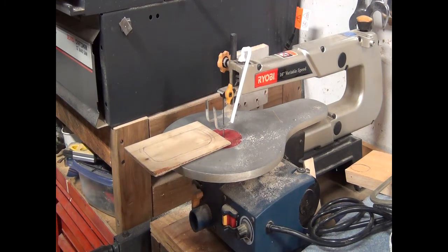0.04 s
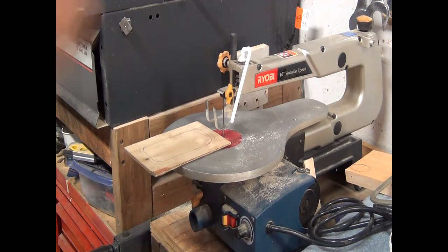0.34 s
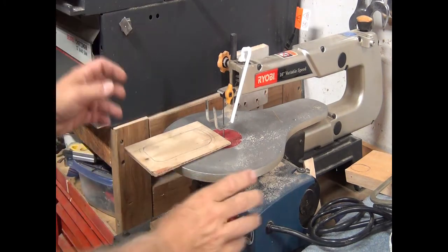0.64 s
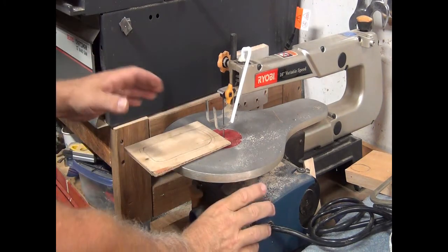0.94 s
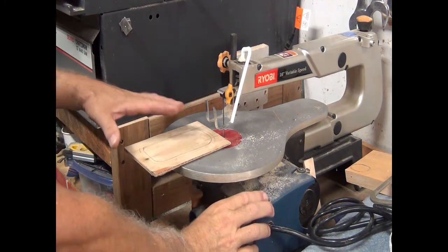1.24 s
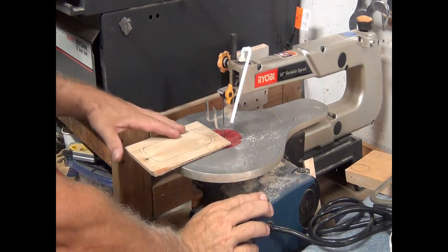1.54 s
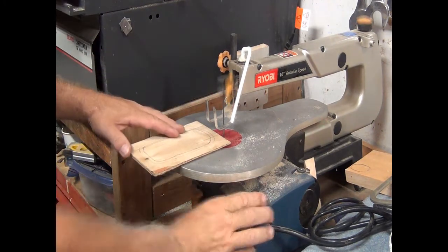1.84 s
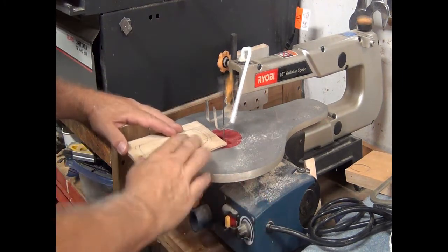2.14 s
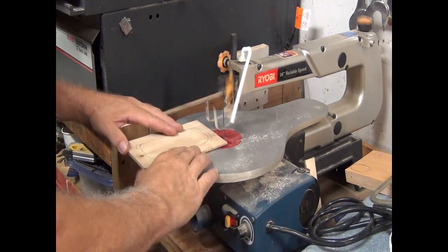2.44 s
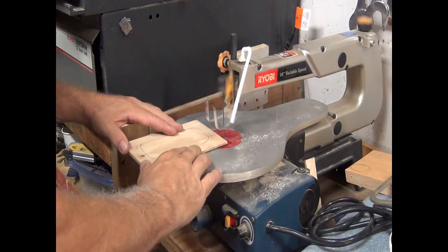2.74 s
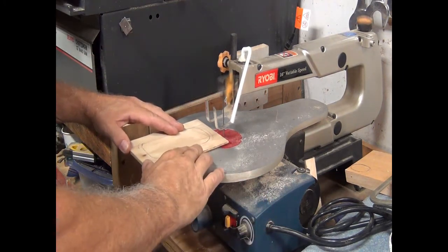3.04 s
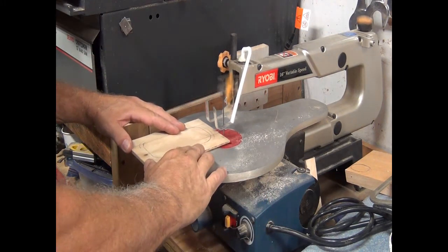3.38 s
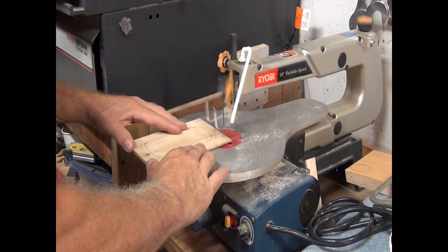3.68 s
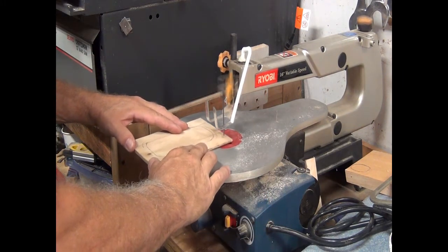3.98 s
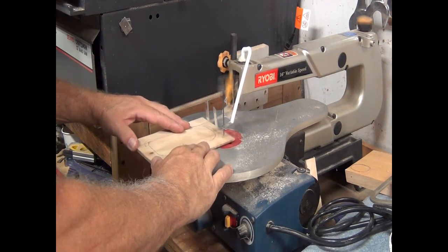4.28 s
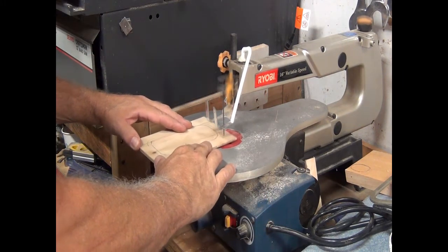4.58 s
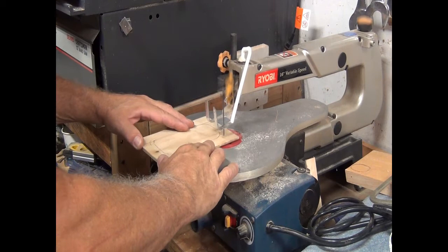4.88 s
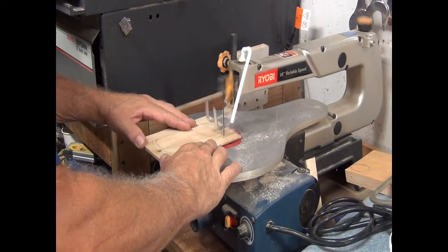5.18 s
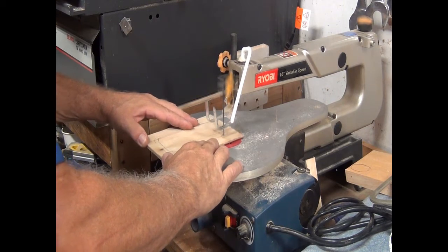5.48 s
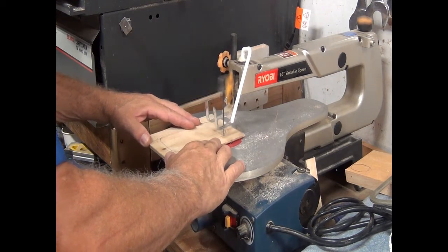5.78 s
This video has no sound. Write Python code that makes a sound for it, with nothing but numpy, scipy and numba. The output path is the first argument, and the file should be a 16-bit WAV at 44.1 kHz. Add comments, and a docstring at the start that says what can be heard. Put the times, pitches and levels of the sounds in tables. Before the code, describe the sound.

In a small workshop, a microphone in front of a scroll saw picks up a faint hum and light clicks. The switch snaps on, and the motor drones under a fast, even knocking and metallic rattle. A thin plywood board meets the blade, bringing a much louder, hissing rasp with wooden chatter and short chirps from the pinched blade. The cutting carries on to the end.

```python
"""Scroll saw in a small workshop

The microphone faces the saw, with the walls near by. A few light clicks over a low hum, then the switch
snaps and the saw runs free, its arm knocking once a stroke. A plywood blank is fed in: the teeth rasp
twice a cycle and the board chatters on the table. The camera's gain control pulls the machine's rumble
down under the much louder cut."""
import sys
import numpy as np
from scipy import signal
from scipy.fft import rfft, irfft, next_fast_len
from scipy.io import wavfile
from scipy.ndimage import uniform_filter1d
from numba import njit

SR = 44100
rng = np.random.default_rng(int(sys.argv[2]) if len(sys.argv) > 2 else 0)


def wrap_up_sound(samples):
    """Save the sound to the file named by the first command line argument, as 16-bit audio."""
    columns = np.atleast_2d(samples).T
    # keep every value between -1 and 1, then stretch to whole-number steps
    tamed = np.clip(columns, -1, 1)
    steps = np.round(tamed * 32767).astype(np.int16)
    wavfile.write(sys.argv[1], SR, steps)


N = 256662
TIME = np.arange(N) / SR
START_S, BITE_S = 1.652, 3.405  # the motor starts; the board meets the blade
RIPPLE_HZ = 120  # rectified mains


# Table levels are relative within each layer; `turn` is the crank position in strokes.
# how hard the teeth work: t/s, then level/dB of downward tearing, upward whistle, upward scrape
TOOTH_EFFORT = [(3.45, -9, 4, 0), (3.75, -7, 2, -6), (4.0, -3.5, 6, 2.5), (4.35, -6.5, -24, -5),
                (4.55, -5, 0, -17), (4.85, -5.5, 3, -25), (5.45, -7, 7.5, -3), (5.8, -5, 0, -2)]
# spectra of chip spray, the teeth's backs and rasping wood: f/Hz, level/dB
CHIP_COLOUR = [(1500, -26), (3500, -1.5), (5200, -3), (6500, -1), (9300, 2.5), (11000, -1), (13000, -7),
               (16000, -23)]
SCRAPE_COLOUR = [(2800, -15), (3600, -10), (4500, -19), (6200, 14.5), (7000, 15), (8200, 6), (12000, -24),
                 (16000, -38)]
RASP_COLOUR = [(150, -18.5), (320, -8), (470, -17.5), (900, 0), (1600, -3), (2600, 1.5), (3600, -0.5),
               (4500, -4), (7000, -8.5), (12000, -25.5)]

def teeth(turn):
    """In front of the microphone, teeth tear fibres going down and scrape the kerf coming up."""
    down_db, up_db, scrape_db = curves(TOOTH_EFFORT)
    down = undb(down_db) * swell(turn, centre=.135, width=.095)
    up = swell(turn, centre=.765, width=.07)
    sliding = swell(turn, centre=.49, width=.17)
    # teeth pass fastest at mid stroke and tear the wood in small grains
    tooth_hz = 1100 * np.abs(np.cos(2 * np.pi * (turn - .2)))
    fibres = (1 + .5 * np.sin(2 * np.pi * np.cumsum(tooth_hz) / SR)) * undb(.8 * walk(250))
    spray = down + .26 * up + .19 * sliding + .07
    chips = through(unit(noise() * fibres * spray), colour(CHIP_COLOUR))
    chips += undb(-4) * kerf_whistle() * unit(down + undb(up_db) * up)
    spray_db = -9 + 5 * np.exp(-(since(BITE_S) / .59) ** 2)  # the board's edge splinters first
    scraping = noise() * fibres * swell(turn, centre=.77, width=.1) * undb(.9 * walk(27))
    scrape = through(unit(scraping), colour(SCRAPE_COLOUR))
    drag = swell(turn, centre=.2, width=.14) + 1.1 * swell(turn, centre=.82, width=.1)
    drag += .45 * sliding + .5
    rasp = through(unit(noise() * fibres * drag * undb(.66 * walk(40))), colour(RASP_COLOUR))
    return undb(spray_db) * chips + undb(scrape_db - 13) * scrape + undb(-4.5) * rasp


def kerf_whistle(edge_hz=9580, sag_hz=1780, width_hz=1230):
    """A band of hiss from the narrow kerf, sinking as the cut deepens."""
    hz = edge_hz - sag_hz * binding()
    band = signal.sosfilt(signal.butter(2, width_hz / 2, fs=SR, output="sos"), noise())
    return unit(band * np.sin(2 * np.pi * np.cumsum(hz) / SR))


# how loosely the board lies on the table: t/s, level/dB
BOARD_LIFT = [(3.48, 3.5), (3.6, -1), (3.72, 0.5), (4.04, -5), (4.2, -1), (4.84, -3), (5.16, 1),
              (5.56, -0.5), (5.8, 5.5)]
# plywood resonances: f/Hz, level/dB
PLYWOOD_MODES = [(500, -4), (628, -1), (738, 0), (945, -.5), (1050, 1.5), (1280, 1.5), (1440, -.5),
                 (1685, -1), (1860, -4), (2220, -4), (2340, -4)]
# its slap and its hollow flexing: f/Hz, width/Hz, level/dB
SLAP_MODES = [(1040, 72, -14), (1065, 26, 5.5), (1250, 6.1, 5.5), (1650, 150, -15)]
FLEX_MODES = [(445, 57, 0), (528.5, 7.9, 2), (626, 7.1, 6.5), (769, 17, 0)]

def board(turn):
    """The plywood sings more the harder it is pushed; it slaps when loose and flexes when held flat."""
    lift_db, = curves(BOARD_LIFT)
    friction = unit(noise() * (swell(turn, centre=.49, width=.17) + .68) * undb(2 * walk(25)))
    body = through(friction, ring([(hz, 32, db) for hz, db in PLYWOOD_MODES]))
    landings = taps(turn, at=.42, spread_db=1)
    slap = unit(through(unit(landings + .5 * bursts(landings, fade_s=.012)), ring(SLAP_MODES)))
    bends = taps(turn, at=.05, spread_db=.5) + taps(turn, at=.55, spread_db=2)
    flex = through(bursts(bends, fade_s=.0052), ring(FLEX_MODES))
    body_db = -7.5 + 3.5 * (force() - 1)
    return undb(body_db) * body + undb(-14.5 + .6 * lift_db) * slap + undb(-18 - 1.4 * lift_db) * flex


# the gripped blade, rising and falling: f/Hz, width/Hz, level/dB
CHIRP_MODES = [(2220, 150, -8), (2590, 80, 1), (3100, 250, -7), (3600, 70, -1), (3965, 50, -3)]
MOAN_MODES = [(1695, 45, 0), (1870, 45, -5), (2230, 70, -7)]

def pinched_blade(turn):
    """The kerf makes the rising blade chirp and, deeper in, the falling blade moan."""
    chirp = through(bursts(taps(turn, at=.76, spread_db=1.5), fade_s=.012), ring(CHIRP_MODES))
    moan = through(bursts(taps(turn, at=.24, spread_db=.5), fade_s=.003), ring(MOAN_MODES))
    return undb(-11.5) * (chirp + binding() * moan)


# the board's hardest slaps and deepest thuds, the blade's loudest chirps: t/s, level/dB
HARD_SLAPS = [(3.47, 0.5), (3.506, -0.5), (3.656, -4), (3.732, -5.5), (3.77, -7), (3.848, -6), (4.145, -9),
              (4.22, -4), (4.257, -12), (4.336, -9), (4.412, -6), (4.452, -6.5), (4.638, -10), (4.721, -10),
              (5.097, -8), (5.212, -3.5), (5.286, -7), (5.361, -8), (5.702, -7), (5.778, -7)]
DEEP_THUDS = [(3.982, -8), (4.021, -2), (4.056, -3)]
LOUD_CHIRPS = [(3.596, -7), (3.784, -8), (3.935, -9), (4.122, -9), (4.158, -3), (4.198, -7), (4.234, -2.5),
               (4.312, -7), (4.384, -5.5), (4.425, -2.5), (4.503, -11), (4.577, -10), (4.882, -6),
               (5.528, -6)]

def chatter():
    """The blade lifts the board and drops it in slaps and thuds, chirping where the kerf grips."""
    slaps = sum(undb(db) * ping(s, hz * (1 + .0088 * rng.standard_normal()), rise_s=.003, fade_s=.011)
                for s, peak_db in HARD_SLAPS for db, hz in ((peak_db, 1052), (peak_db - 5, 1277)))
    thuds = sum(undb(db) * ping(s, hz=503, rise_s=.002, fade_s=.01) for s, db in DEEP_THUDS)
    chirps = sum(undb(db) * ping(s, hz=2580 + 20 * rng.standard_normal(), rise_s=.0035, fade_s=.006)
                 for s, db in LOUD_CHIRPS)
    return undb(1) * (slaps + thuds + chirps)


# spectra of the arm's knock and of metal on metal in its bearing: f/Hz, level/dB
KNOCK_COLOUR = [(300, -2.5), (520, -1), (720, 0.5), (900, 3.5), (1150, -2.5), (1850, 2), (2100, -7),
                (3100, -7.5), (4300, -20), (6000, -12), (7500, -13), (10000, -22), (16000, -35)]
TICK_COLOUR = [(2000, -15), (3000, -10), (4300, -6), (6000, -3), (7400, 24), (9500, 20), (13000, 8),
               (16000, -3)]
# arm and table resonances: f/Hz, level/dB
FRAME_MODES = [(688, -1), (852, -2), (881, 2.5), (1046, 2), (1266, -4), (1458, -5), (1679, 2), (1816, -7),
               (1844, -7), (1954, 0), (2310, -4), (2420, -5), (2998, -5), (3107, -7)]

def arm_knock(turn):
    """The arm knocks in its loose bearing once a stroke; housing and workshop walls throw it back."""
    play = .0006 * walk(40)
    # one jolt as the motor starts, then a blow after every full stroke
    blow = taps(np.maximum(turn + play, .5) * (TIME > START_S), at=.014, spread_db=1)
    bounce = taps(turn + 2 * play, at=.0545, spread_db=2)
    rattle = taps(turn + 2 * play, at=.2, spread_db=5.5)
    blows = blow + undb(-17) * bounce + undb(-14.5) * rattle
    crack = -through(blows, colour(KNOCK_COLOUR))
    housing = through(crack, scatter(t60=.042))
    walls = through(crack, scatter(t60=.28))
    tick = through(bursts(blow, fade_s=.0082), colour(TICK_COLOUR))
    loose_parts = through(bursts(blow, fade_s=.0079), colour(KNOCK_COLOUR))
    ringing = through(blows, ring([(hz, 13, db) for hz, db in FRAME_MODES]))
    direct = undb(-8.5) * loose_parts + undb(-11) * crack + undb(-5) * ringing + undb(-12) * tick
    return undb(-19 + build_up_db() + 9 * binding()) * (direct + undb(-5.5) * (housing + walls))


# how hard the blade rubs its guide: t/s, level/dB
GUIDE_RUB = [(1.78, -25), (1.86, -6), (2.06, -7.5), (2.14, -4.5), (2.36, -2), (2.41, -10), (2.48, -7.5),
             (2.56, -2.5), (2.72, 0.5), (2.9, -4.5), (3.34, -8.5)]
# spectrum of that rubbing: f/Hz, level/dB
HISS_COLOUR = [(900, -9), (2500, 6.5), (4500, 7.5), (6500, 5.5), (9000, 7), (12000, 3.5), (16000, -15)]
# the taut blade: f/Hz, width/Hz, level/dB
BLADE_MODES = [(6280, 200, 0), (7900, 150, 0)]
# catches on the guide: t/s, lower ring level/dB, upper ring level/dB, fade/s
GUIDE_CATCHES = [(2.115, -25, -31, 0.006), (2.152, -26, -20.5, 0.0083), (2.188, -25, -26.1, 0.0054),
                 (2.225, -33, -24, 0.004), (2.261, -32, -25.3, 0.004), (2.298, -32, -29, 0.0046),
                 (2.335, -24, -24, 0.004), (2.588, -23, -20, 0.006), (2.624, -23.4, -20, 0.0036),
                 (2.697, -35, -20.5, 0.006), (2.733, -27, -18, 0.0033), (2.842, -24, -22, 0.004)]

def blade_on_guide(turn):
    """The blade brushes its guide, hissing, ringing and rattling the holder; each catch chinks."""
    rub_db, = curves(GUIDE_RUB)
    brush = unit(swell(turn, centre=.67, width=.21) + .14 * swell(turn, centre=.053, width=.19) + .14)
    hiss = through(noise() * brush, colour(HISS_COLOUR))
    squeal = through(noise() * unit(swell(turn, centre=.636, width=.045)), ring(BLADE_MODES))
    contacts = taps(turn + .0303 * walk(25), at=.55, spread_db=4)
    holder = through(contacts, ring([(832, 30, -7), (1045, 31, -2), (1319, 22, -2), (1808, 33, 1.5)]))
    chinks = sum(undb(db) * ping(s, hz + width / 2 * rng.standard_normal(), rise_s=.0028, fade_s=fade)
                 for s, *levels, fade in GUIDE_CATCHES for db, (hz, width, _) in zip(levels, BLADE_MODES))
    scrapes = sum(undb(db - 3) * dying(s - fade / 2, fade) for s, _, db, fade in GUIDE_CATCHES)
    chinks += through(noise() * scrapes, colour(HISS_COLOUR))
    hiss_db, squeal_db = -22.5 + 1.25 * rub_db, -35.5 + rub_db
    return undb(hiss_db) * (hiss + undb(-1) * holder) + undb(squeal_db) * squeal + chinks


# frame vibration: multiple of the stroke rate, level/dB
SHAKE_HARMONICS = [(2, -7.5), (3, -7.5), (4, -6), (5, -4.5), (6, -6), (7, -2), (8, -5), (9, -4), (10, -9),
                   (12, -1.5), (14, -16), (15, -3), (16, -8.5), (17, -3), (19, -6.5)]
# frame rumble: f/Hz, level/dB
RUMBLE_COLOUR = [(240, -10.5), (330, -7.5), (600, -8.5), (1300, -7.5), (2500, -14.5), (5000, -34.5)]
# motor tones under a swinging load: multiple of the ripple, added multiple of the stroke rate, level/dB
MOTOR_TONES = [(1, 0, -20.5), (1, 1, -5.5), (1, 2, -17.5), (2, -1, -18.5), (2, 0, -10)]

def frame_shake(turn):
    """The rocking arm shakes the frame over the motor's drone; the cutting force damps both."""
    rub_db, = curves(GUIDE_RUB)
    unsteady = .005 * undb(rub_db)  # the shake wavers while the blade rubs
    shake = unit(sum(undb(db + 2.5 * walk(7.1)) * sine(k * (turn + unsteady * walk(14) + rng.random()))
                     for k, db in SHAKE_HARMONICS))
    rumble = undb(-2 - 1.3 * force()) * through(noise(), colour(RUMBLE_COLOUR))
    drone = sum(undb(db + walk(15)) * sine(m * RIPPLE_HZ * TIME + k * turn + rng.random())
                for m, k, db in MOTOR_TONES)
    speed = np.gradient(turn) * SR / IDLE_HZ
    return undb(-20 + build_up_db() - 1.5 * force()) * (undb(-1.5) * speed ** 4 * shake + rumble + drone)


# the table in free run: t/s, then level/dB at 11 and 13 times the stroke rate and of the rattle
TABLE_SWELLS = [(1.75, -54, -33, -41), (1.87, -27, -27, -44), (2.0, -29.5, -32, -30),
                (2.18, -21.5, -27, -39), (2.29, -26, -32, -31), (2.37, -41, -42, -35),
                (2.516, -22, -22, -34), (2.6, -26, -21.5, -33), (2.666, -20, -19, -27.5),
                (2.8, -31, -22.5, -26.5), (2.874, -22, -26, -26), (2.972, -37, -27.5, -34),
                (3.39, -53, -32, -43), (3.46, -85, -45, -75)]
# sheet metal of the base: f/Hz, width/Hz, level/dB
BASE_MODES = [(226, 32, -5.5), (418, 15, 1), (464, 31, -4.5), (796, 23, -1)]

def saw_table(turn):
    """The table booms at two multiples of the stroke rate, and loose sheet metal rattles unevenly."""
    low_db, high_db, rattle_db = curves(TABLE_SWELLS)
    boom = sum(undb(db) * np.sqrt(2) * sine(k * turn + .07 * walk(22) + rng.random())
               for k, db in ((11, low_db), (13, high_db)))
    contacts = taps(turn + .059 * walk(20), at=.201, spread_db=9.5)
    contacts += taps(turn + .0596 * walk(18), at=.72, spread_db=0)
    return undb(-1.5) * boom + undb(rattle_db + 2) * unit(through(contacts, ring(BASE_MODES)))


def motor_start():
    """The inrush of current makes the motor buzz briefly at twice the mains rate."""
    age = since(START_S)
    buzz = sum(sine(k * (RIPPLE_HZ * age + rng.random())) / k ** .24 for k in range(1, 5))
    return undb(-24.5) * unit(buzz) * (1 - np.exp(-age / .02)) * np.exp(-age / .14)


# the blade starting to move: t/s, level/dB, f/Hz, width/Hz, fade/s
START_SQUEAKS = [(1.687, -19, 2530, 197, 0.02), (1.694, -18, 3050, 199, 0.01)]

def squeaks():
    """Each short scrape of the blade rings one narrow resonance."""
    return sum(undb(db) * through(noise() * dying(s, fade), ring([(hz, width, 0)]))
               for s, db, hz, width, fade in START_SQUEAKS)


# three light clicks, then the switch: t/s, level/dB, ring f/Hz, snap level/dB, contact/s
CONTACTS = [(0.0275, -31, 2870, 5.5, 0.0027), (0.533, -38, 2440, 1, 0.0015),
            (0.8564, -26.5, 2660, -23, 0.0012), (1.6517, -33, 3140, 14, 0.011)]

def clicks():
    """Small hard contacts: a snap, a short ring and a tail from the nearby walls."""
    out = np.zeros(N)
    snap = colour([(1000, -9), (1500, -11), (3000, 3.5), (4200, -1.5), (6000, 2), (10000, .5),
                   (16000, -9)])
    for s, db, hz, snap_db, contact in CONTACTS:
        push = noise() * (dying(s, contact) + undb(-10.5) * dying(s, fade_s=.027))
        out += undb(db) * (through(push, ring([(hz, 840, 0)])) + undb(snap_db) * through(push, snap))
    return out


def hand():
    """A hand brushes the machine while reaching for the switch."""
    brush = np.exp(-.5 * ((TIME - .77) / .15) ** 2) * undb(2.8 * walk(52.8))
    friction = through(noise(), colour([(200, 8), (1400, .5), (4000, -14), (7000, -9), (14000, -23)]))
    return undb(-50) * brush * friction


# the workshop's air and its hum: f/Hz, level/dB
ROOM_COLOUR = [(25, -20), (50, -12), (120, -11), (270, -5.5), (450, -12.5), (700, -21), (880, -14),
               (1100, -25.5), (1600, -29), (2900, -33), (3380, -29.5), (3650, -37), (7000, -37),
               (16000, -39.5)]
HUM_TONES = [(59.5, -58), (118.5, -51.5), (184, -56.5), (258, -54), (3822, -71)]

def room_tone():
    """Low room noise and a steady hum behind the saw."""
    air = through(noise(), colour(ROOM_COLOUR))
    hum = sum(undb(db + 2.8 * walk(7.8)) * np.sqrt(2) * sine(hz * TIME + rng.random())
              for hz, db in HUM_TONES)
    return undb(-45.5) * air + undb(-4) * hum


IDLE_HZ = 27.5007  # strokes per second in free run

def crank(spin_up_s=.0369, sag_hz=.8682, jam_hz=14.31, rest_turn=-.1723):
    """Strokes completed: the motor spins up, jams briefly at the bite and sags with the cutting force."""
    free_hz = IDLE_HZ * (1 - np.exp(-since(START_S) / spin_up_s))
    hz = free_hz - sag_hz * force() - jam_hz * dying(BITE_S, fade_s=.02)
    return rest_turn + np.cumsum(hz) / SR


def force(rise_s=.07, lean_db_per_s=1.055):
    """Cutting force: it rises at the bite, grows as the hands lean in and swells with one harder push."""
    push_db = 3.055 * np.exp(-.5 * ((TIME - 4.5) / .2) ** 2)
    age = since(BITE_S)
    return (1 - np.exp(-age / rise_s)) * undb(lean_db_per_s * age + push_db)


def binding(full_grip_s=2.4):
    """The kerf's grip on the blade, from 0 to about 1, growing ever faster as the cut deepens."""
    return (since(BITE_S) / full_grip_s) ** 2


def build_up_db():
    """Shake and knock start soft and build to their running level."""
    return -9 * np.exp(-since(START_S) / .46)


def undb(db):
    """Decibels to gain."""
    return 10 ** (np.asarray(db) / 20)


def curves(table):
    """The columns of a table of (t/s, ...) rows at every sample."""
    s, *columns = np.transpose(table)
    return [np.interp(TIME, s, c) for c in columns]


def unit(x):
    """Scale to rms 1."""
    return x / np.sqrt(np.mean(x ** 2) + 1e-18)


def sine(cycles):
    """Sine of a phase in cycles."""
    return np.sin(2 * np.pi * cycles)


def noise():
    """White noise."""
    return rng.standard_normal(N)


def walk(rate_hz):
    """Smooth random drift of rms 1."""
    step = max(int(SR / rate_hz), 1)
    return unit(uniform_filter1d(np.repeat(rng.standard_normal(N // step + 1), step), step)[:N])


def since(s):
    """Seconds passed since a moment, 0 before it."""
    return np.maximum(TIME - s, 0)


def dying(s, fade_s):
    """An envelope that jumps to 1 at a moment and dies away."""
    return (TIME > s) * np.exp(-since(s) / fade_s)


def swell(turn, centre, width):
    """A smooth rise and fall around one crank position, once a stroke."""
    return np.exp(-.5 * (((turn - centre + .5) % 1 - .5) / width) ** 2)


def taps(turn, at, spread_db):
    """One impulse of uneven strength each time the crank passes a position."""
    where = np.flatnonzero(np.diff(np.floor(turn - at)) > 0)
    out = np.zeros(N)
    out[where] = undb(spread_db * rng.standard_normal(len(where)))
    return unit(out)


def bursts(impulses, fade_s, size=4096):
    """Each impulse becomes a short scrape that dies away."""
    return unit(noise() * through(impulses, np.exp(-TIME[:size] / fade_s)))


def ping(s, hz, rise_s, fade_s):
    """One resonance swells to rms 1 at a moment and dies away."""
    out = np.zeros(N)
    near = slice(np.searchsorted(TIME, s - 4 * rise_s), np.searchsorted(TIME, s + 7 * fade_s))
    age = TIME[near] - s
    shape = np.exp(-.5 * (np.minimum(age, 0) / rise_s) ** 2 - np.maximum(age, 0) / fade_s)
    out[near] = np.sqrt(2) * shape * sine(hz * age + rng.random())
    return out


def through(x, response):
    """Play a sound through an impulse response."""
    return signal.fftconvolve(x, response)[:N]


def colour(points, size=4096):
    """Unit-energy response with a (f/Hz, level/dB) spectrum, falling 12 dB an octave below its start."""
    hz, db = np.transpose(points)
    f = np.maximum(np.arange(size // 2 + 1) * SR / size, 10)
    gain = undb(np.interp(np.log(f), np.log(hz), db)) * np.minimum(f / hz[0], 1) ** 2
    cepstrum = irfft(np.log(gain))
    cepstrum[1:size // 2] *= 2  # folding the cepstrum makes the response causal
    cepstrum[size // 2 + 1:] = 0
    return unit(irfft(np.exp(rfft(cepstrum)))) / np.sqrt(size)


def ring(modes, size=8192):
    """Unit-energy response of (f/Hz, width/Hz, level/dB) modes; neighbours swing in opposite ways."""
    t = TIME[:size]
    waves = [(-1) ** k * undb(db) * width * np.exp(-np.pi * width * t) * np.cos(2 * np.pi * hz * t)
             for k, (hz, width, db) in enumerate(modes)]
    return unit(sum(waves)) / np.sqrt(size)


def scatter(t60, size=16384):
    """Dense reflections of unit energy and even colour that die away in about t60 seconds."""
    fade = np.exp(-np.log(1000) * TIME[:size] / t60)
    spectrum = rfft(rng.standard_normal(size) * fade)
    return unit(irfft(spectrum / np.abs(spectrum)) * np.sqrt(fade)) / np.sqrt(size)


# the saw's side signal against its mid at the microphone: f/Hz, level/dB
SIDE_COLOUR = [(130, -16.5), (550, -12), (1100, -15.5), (2200, -17.5), (4400, -12), (8000, -17.5),
               (13000, -36)]

def wall_reflections(saw):
    """The workshop walls return the saw from the sides and add a little width."""
    hz, db = np.transpose(SIDE_COLOUR)
    size = next_fast_len(N)
    gain = undb(np.interp(np.arange(size // 2 + 1) * SR / size, hz, db))
    return irfft(rfft(through(saw, scatter(t60=.48)), size) * gain, size)[:N]


def scene():
    """The saw stands centred before a stereo microphone; faint hiss differs between left and right."""
    turn = crank()
    switched_on = np.clip(since(START_S) / .0072, 0, 1)
    machine = frame_shake(turn) + arm_knock(turn) + saw_table(turn) + blade_on_guide(turn)
    cut = teeth(turn) + board(turn) + pinched_blade(turn) + chatter()
    saw = switched_on * machine + force() * cut + motor_start()
    small_sounds = clicks() + squeaks() + hand()
    side = wall_reflections(saw) + undb(-14.5) * through(small_sounds, scatter(t60=.071))
    side += undb(-61) * through(noise(), colour([(300, 2), (900, 1), (4000, -8), (13000, -32)]))
    mid = saw + small_sounds + room_tone()
    return np.array([undb(.04) * mid + side, undb(-.3) * mid - side])


@njit
def follow(level, attack, release):
    """Envelope that rises quickly and falls slowly."""
    out, held = np.empty(len(level)), 0.
    for i in range(len(level)):
        held += (level[i] - held) * (attack if level[i] > held else release)
        out[i] = held
    return out


def gain_control(x, limit_db, attack_s, release_s):
    """Turn the gain down whenever the level passes the limit."""
    level = np.sqrt(np.abs(uniform_filter1d(np.mean(x ** 2, axis=0), size=256)))
    held = follow(level, 1 / (attack_s * SR), 1 / (release_s * SR))
    return x / np.maximum(held / undb(limit_db), 1)


def record(dry):
    """The camera holds the microphone's level, rounds the highest peaks and cuts the top."""
    held = gain_control(dry, limit_db=-14.5, attack_s=.002, release_s=.19)
    lowpass = signal.ellip(8, .2, 70, 15900, fs=SR, output="sos")
    return signal.sosfilt(lowpass, np.tanh(1.196 * held) / 1.117)


dry = scene()
out = record(dry)
wrap_up_sound(out)
```